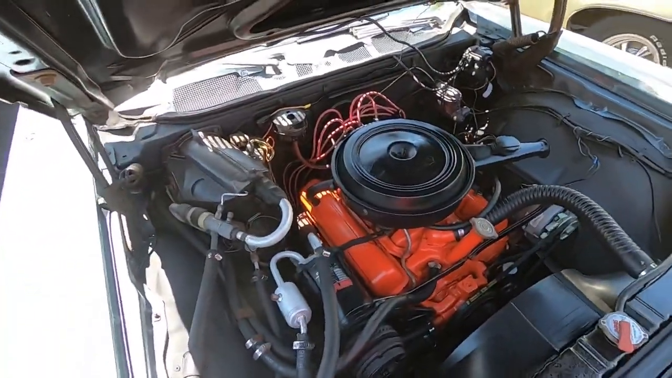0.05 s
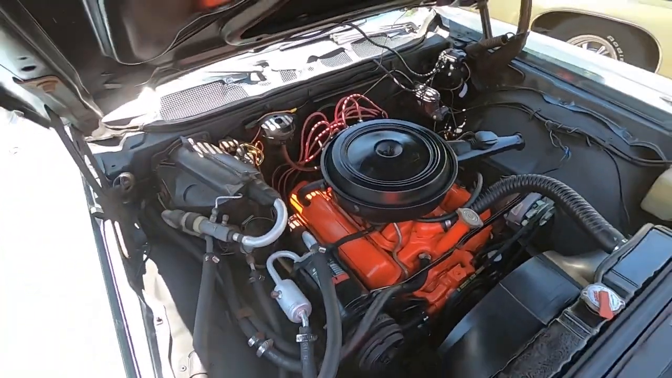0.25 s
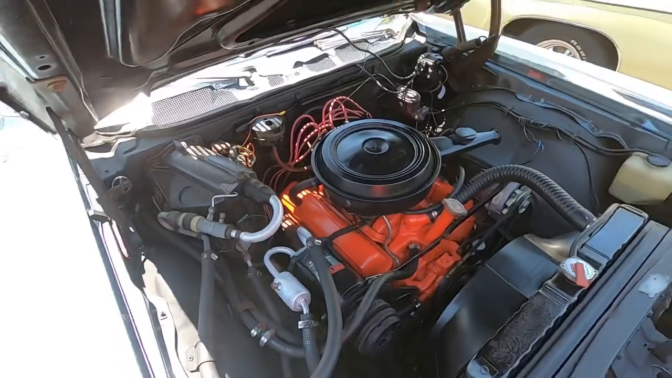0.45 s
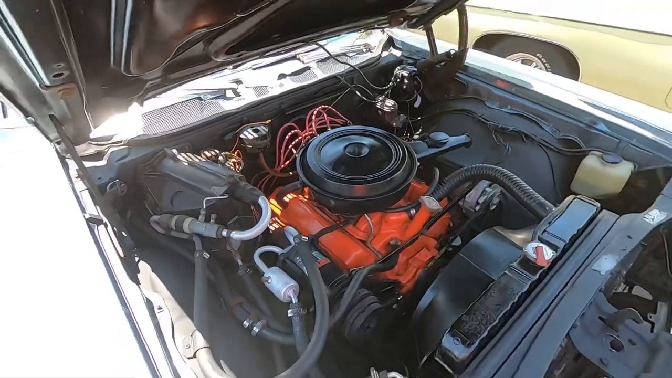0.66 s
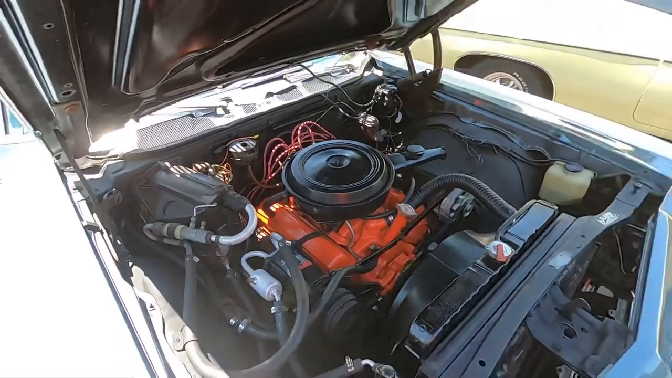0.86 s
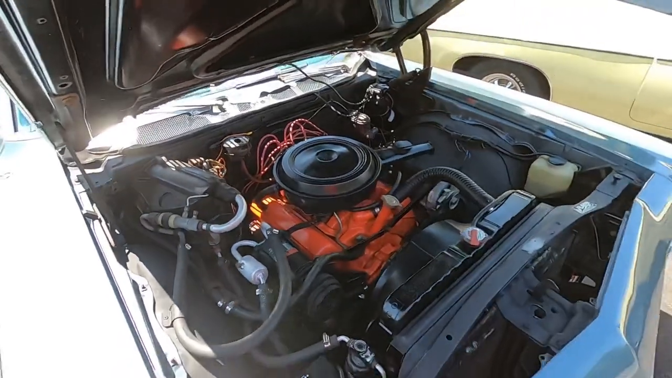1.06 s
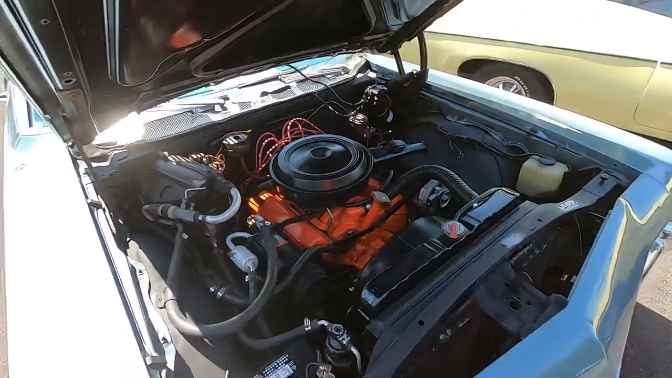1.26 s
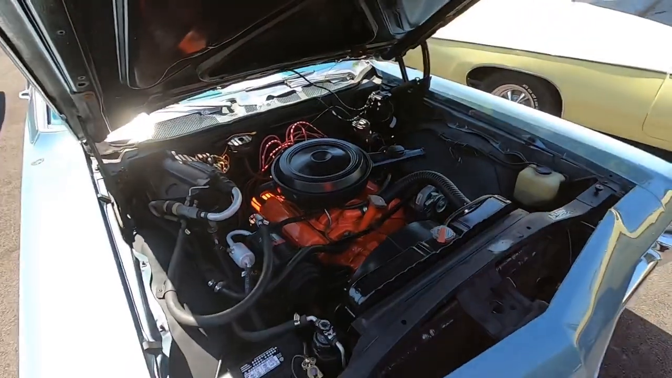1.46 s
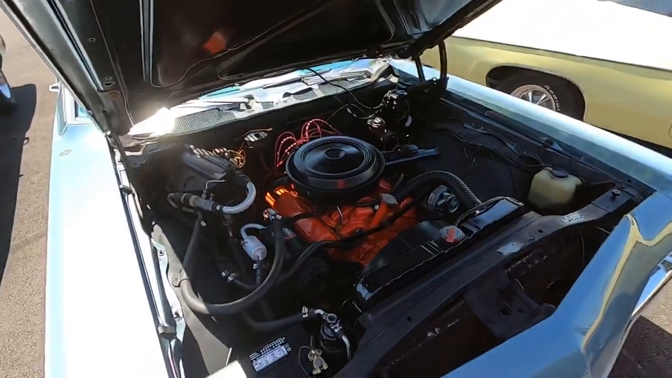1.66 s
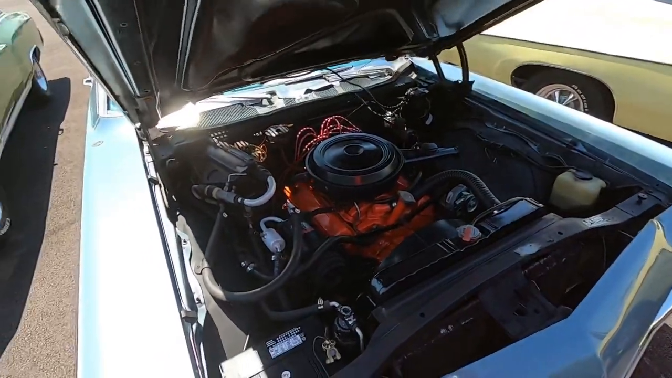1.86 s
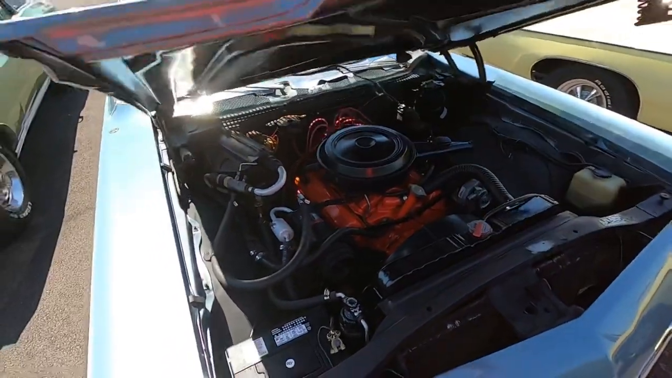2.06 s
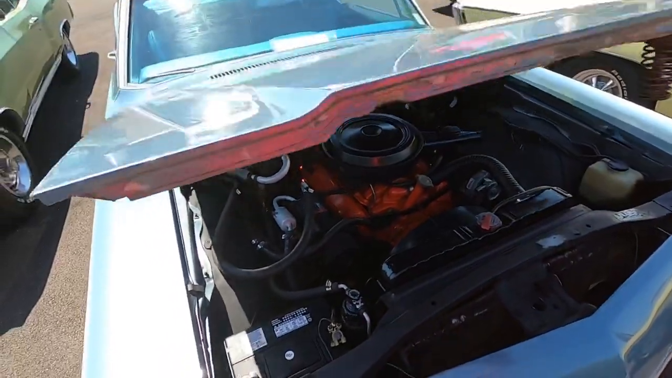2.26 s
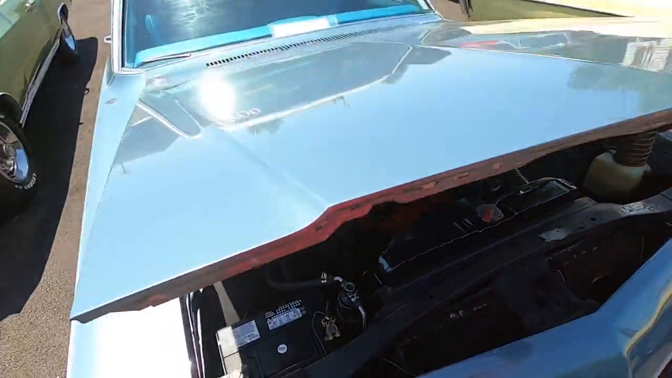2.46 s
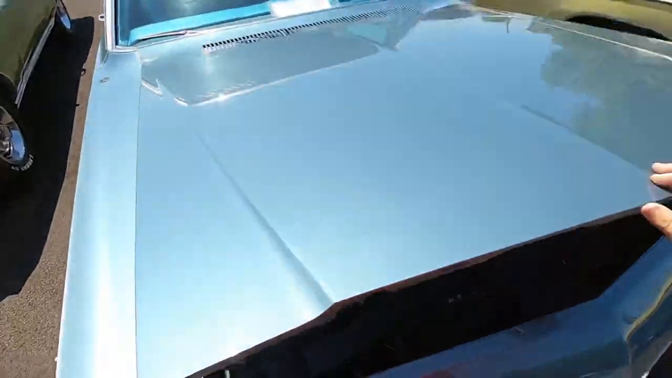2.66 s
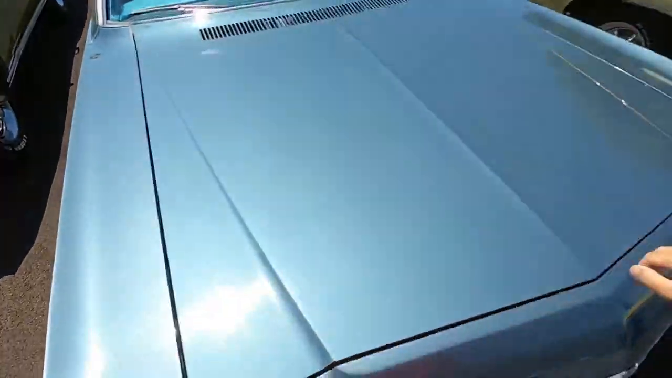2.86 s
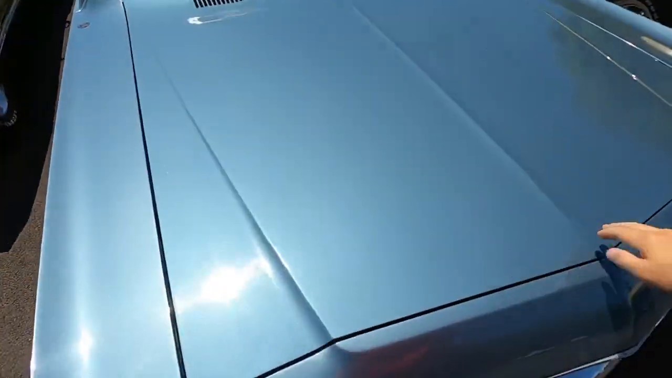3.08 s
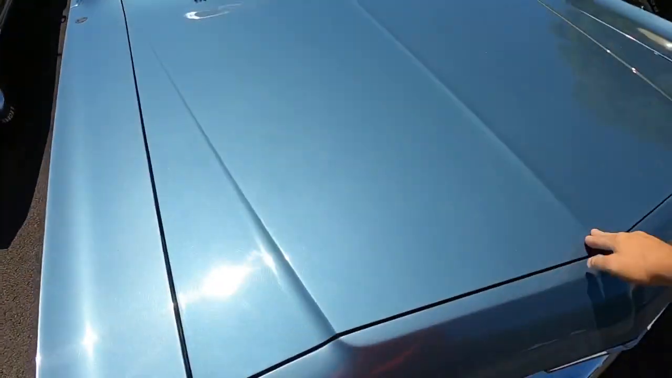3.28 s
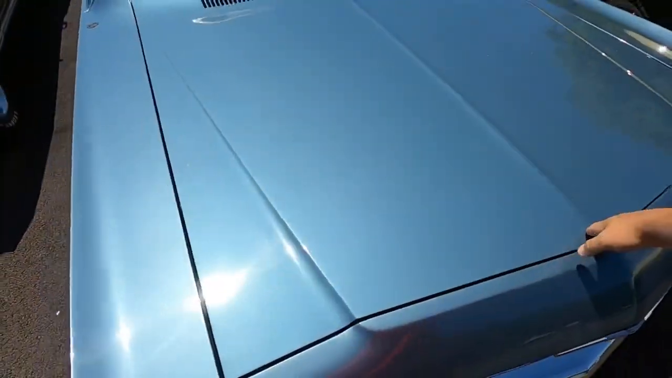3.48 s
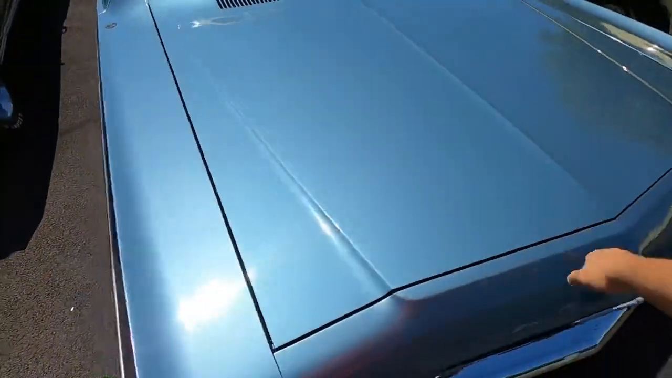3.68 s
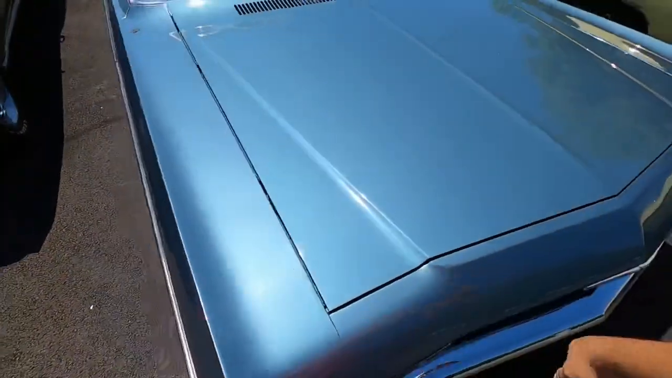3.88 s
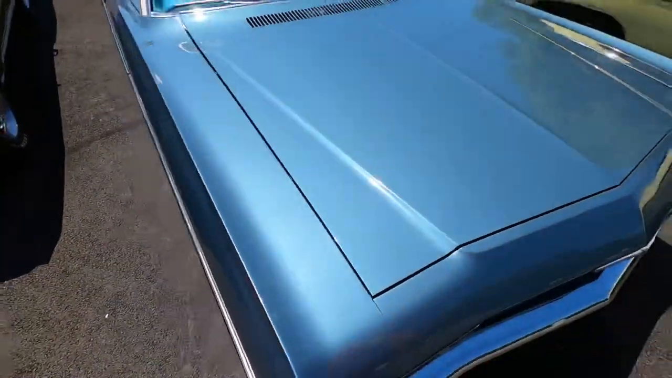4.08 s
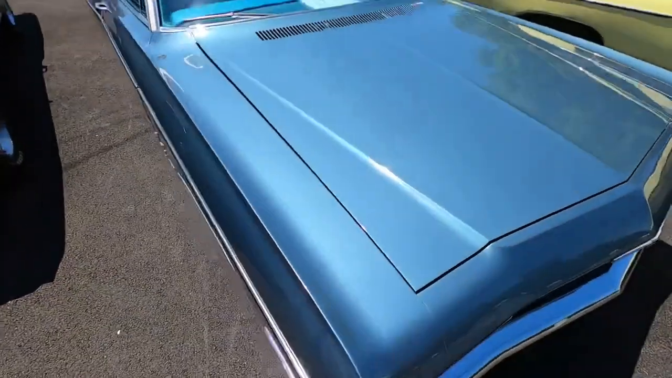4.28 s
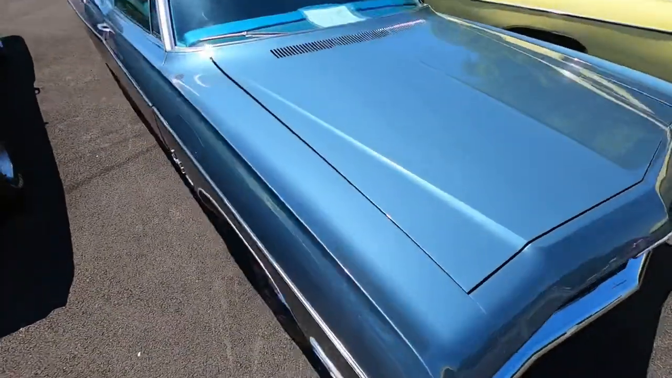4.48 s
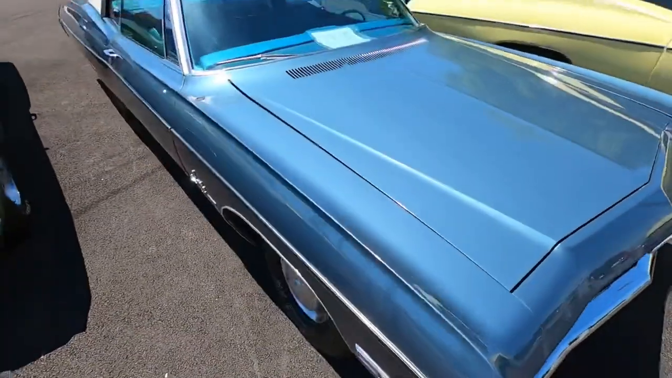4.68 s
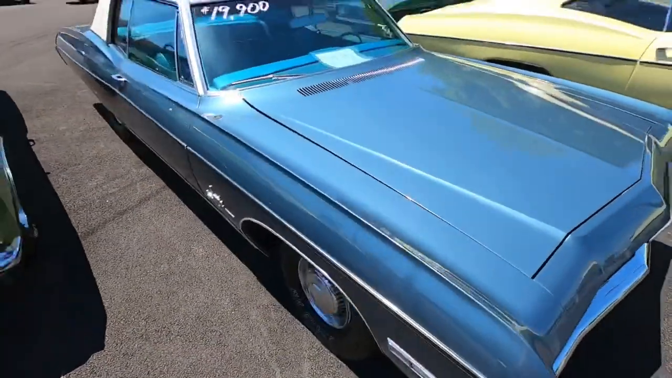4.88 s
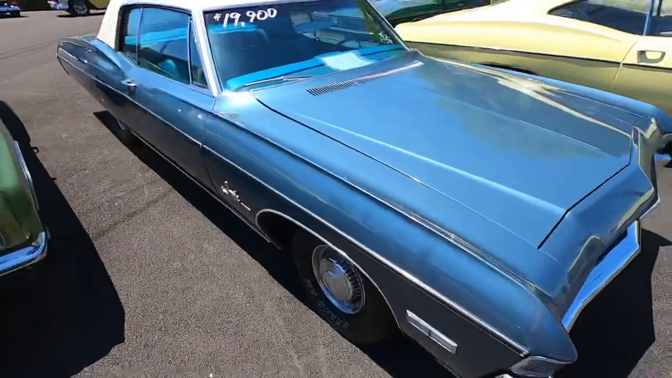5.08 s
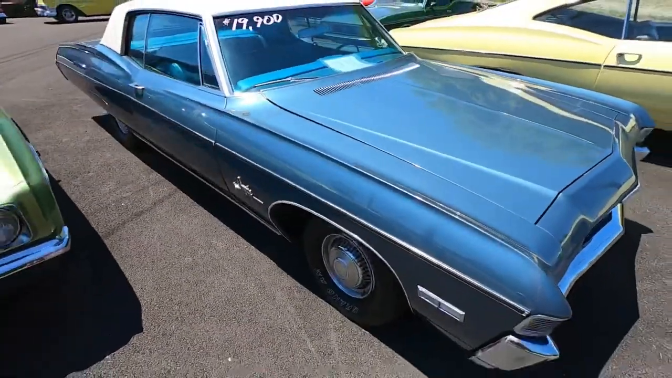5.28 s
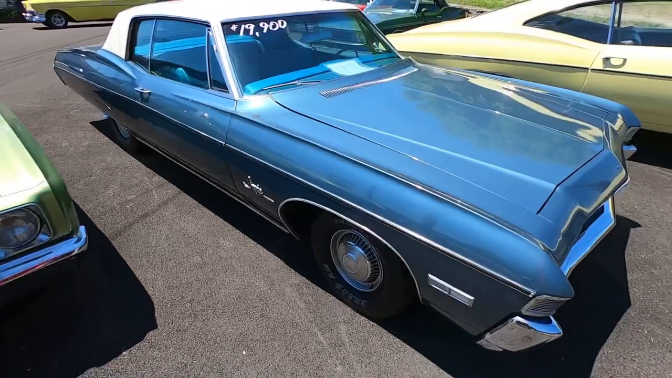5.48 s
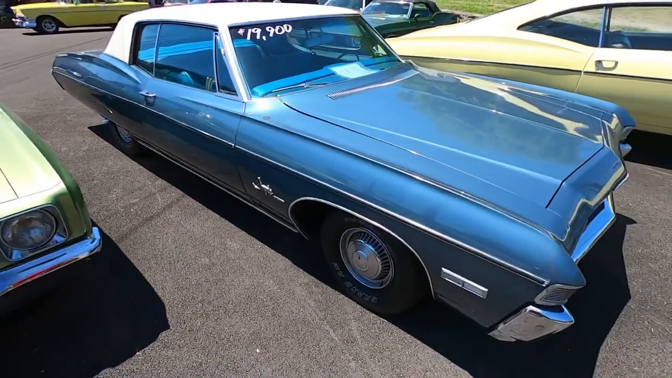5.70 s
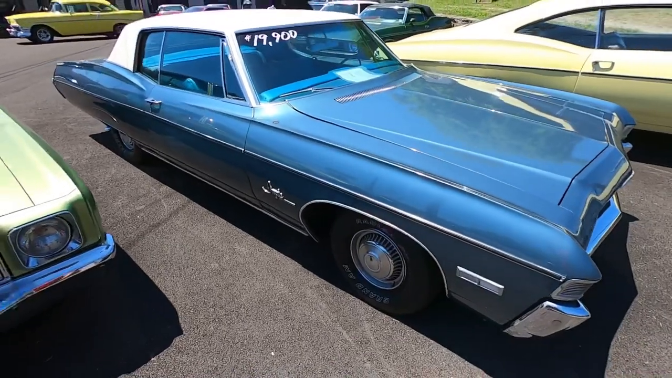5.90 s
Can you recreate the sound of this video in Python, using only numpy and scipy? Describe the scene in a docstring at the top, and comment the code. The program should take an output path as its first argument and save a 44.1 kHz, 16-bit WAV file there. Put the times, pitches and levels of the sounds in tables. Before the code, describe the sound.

Outdoor road rumble slowly thickens while tiny clicks and scuffs come mostly from the right. Midway a large sheet-metal hood bangs shut very loudly, with latch clatter, low boom and a brief shivering rattle, dry and close. Afterwards the traffic seems ducked and recovers gradually, with a brush of cloth, low engine tones rising, one small tick and approaching tyre hiss on the right.

```python
"""In a car park, a heavy steel car hood is dropped shut: latch, bounce and boom.
Struck modes ring under banded noise for the shivering sheet; latch and trim clatter and rattle.
Gliding tones make engines climbing in three stretches, and the narrow hums and thin whistles.
Noise bands make the deep rumble of wind at the microphones, the roar and hiss of traffic, a car
drawing near on the right, rustling cloth and small ticks. Loud sound pulls the gain down for a while."""
import sys
import numpy as np
from scipy import signal
from scipy.fft import irfft, next_fast_len
from scipy.io import wavfile
from scipy.ndimage import uniform_filter1d

SR = 44100
rng = np.random.default_rng(int(sys.argv[2]) if len(sys.argv) > 2 else 0)


def pcm_store(signal):
    """Save signal as 16-bit PCM."""
    levels = np.round(np.clip(np.atleast_2d(signal), -1, 1) * 32767)
    wavfile.write(sys.argv[1], SR, levels.astype(np.int16).T)


N = 261954
TIME = np.arange(N) / SR
COARSE = TIME[::64]  # slower clock for levels that move gently


# hood meeting latch and bumpers, then bouncing: start_s, clatter_db, push_db, clatter_centre_hz
# (clatter_db and push_db are relative)
BLOWS = [(2.9021, -11, -18, 2280), (2.92, -23.5, -4, 6560), (2.923, -18, -39, 3570), (2.946, -27, -6, 8600),
         (2.954, -37, -12, 2180), (2.965, -19, -3, 3020), (3.158, -50, -17.5, 1200),
         (3.172, -45, -42, 7100)]
# ringing modes of the hood: pitch_hz, level_db (relative), t60_s
HOOD_MODES = [(62, 2, 0.16), (108, 11, 0.16), (176, -9, 0.94), (250, -15, 0.88), (294.8, -6, 0.66),
              (367, -11, 0.37), (476, -12.5, 0.65), (506, -8, 0.25), (1030, -27, 0.42), (1172, -6, 0.36),
              (2080, -15, 0.18)]
# colour of the sheet's dense shiver: freq_hz, level_db (relative, per Hz)
SHEET_COLOUR = [(30, -12), (105, -3), (220, -4), (470, -10.5), (900, -19), (2200, -24), (3700, -29.5),
                (4300, -35.5), (6800, -40), (9000, -49), (15500, -77)]
# stereo tilt of the hood: freq_hz, left_minus_right_db
HOOD_BALANCE = [(200, 0.5), (700, -4.5), (2400, -4.5), (5400, -0.5), (8100, -17.5), (15000, -21)]
# stereo likeness of the shiver: freq_hz, likeness (-1 to 1)
HOOD_ALIKE = [(60, 0.93), (290, 1), (640, 0.48), (1400, 0.42), (3100, 0.44), (5500, 0.12), (12000, -0.6)]
SHEET_DB, RING_DB = -9, -10.5
HIGHS_DB, HIGHS_HOLD_S, HIGHS_FALL_DB_S = 4.5, 0.052, 94
FIRST_FALL_DB, FIRST_FALL_S = 7.5, 0.11  # extra early drop of the highs
LOWS_START_DB, LOWS_SWELL_S, LOWS_HOLD_S, LOWS_FALL_DB_S = -15.5, 0.076, 0.1, 123
CLATTER_T60_S = 0.045
LATCH_PAN_DB = -9  # left minus right: the struck parts sit right of the sheet


def hood():
    """Blows ring the modes of the hood, latch and trim clatter, and the sheet shivers and rattles out."""
    size, start = SR * 3 // 5, BLOWS[0][0]
    t = TIME[:size]
    force = np.zeros(size)
    out = latch(t)
    for s, clatter_db, push_db, hz in BLOWS:
        force[int((s - start) * SR)] = undb(push_db)
        clatter = spread(band(hz, 0.6, size=size), 0.22, at_hz(HOOD_BALANCE, hz))
        envelope = fade(t - s + start, 0.00048, CLATTER_T60_S)
        out += 0.31 * undb(clatter_db) * pan(LATCH_PAN_DB) * clatter * envelope
    ring, shiver = hood_ring(force, t), sheet_shiver(t)
    first = SR // 10  # both layers are levelled on their first tenth of a second
    out += undb(RING_DB) * ring / ring[:, :first].std()
    out += undb(SHEET_DB) * shiver / shiver[:, :first].std()
    i = int(start * SR)
    return np.pad(out, ((0, 0), (i, N - i - size)))


def hood_ring(force, t):
    """Each push sets off decaying sines, one for every mode, with alternating signs."""
    ring = 0
    for k, (hz, db, t60) in enumerate(HOOD_MODES):
        mode = (-1) ** k * undb(db - 60 * t / t60) * np.sin(2 * np.pi * hz * t)
        struck = signal.fftconvolve(force, mode)[:len(t)]
        ring = ring + struck * pan(at_hz(HOOD_BALANCE, hz))
    return ring


def sheet_shiver(t):
    """Dense bending of the sheet as noise bands: the highs hold and fall, the lows swell late."""
    lows_db = LOWS_START_DB * np.maximum(1 - t / LOWS_SWELL_S, 0)
    lows_db = lows_db - LOWS_FALL_DB_S * np.maximum(t - LOWS_SWELL_S - LOWS_HOLD_S, 0)
    since_hold = t - HIGHS_HOLD_S
    highs_db = HIGHS_DB - HIGHS_FALL_DB_S * np.maximum(since_hold, 0)
    highs_db = highs_db - FIRST_FALL_DB * np.clip(since_hold / FIRST_FALL_S, 0, 1)
    highs_db = highs_db + walk(60)[:len(t)]  # loose parts rattle
    shiver = 0
    for hz in 35 * 2 ** np.arange(0, 8.8, 1 / 3):
        noise = spread(band(hz, .25, size=len(t)), at_hz(HOOD_ALIKE, hz), at_hz(HOOD_BALANCE, hz))
        # share of the highs' envelope: the treble dies soonest
        high = at_hz([(250, 0.24), (1500, 0.53), (4500, 0.87), (12000, 0.97)], hz)
        colour_db = at_hz(SHEET_COLOUR, hz) + 10 * np.log10(hz)  # per Hz to per band
        shiver = shiver + undb(colour_db + max(1 - high, 0) * lows_db + high * highs_db) * noise
    return shiver


# modes of latch and trim: pitch_hz, level_db (relative)
LATCH_MODES = [(1170, -5), (2085, -0.5), (2296, -9), (2740, -4), (3340, -2.5), (3750, -3.5), (6700, -2.5),
               (8900, -2.5)]
RATTLES, RATTLE_S = 70, .26  # how many random knocks, over how long
RATTLE_DB, RATTLE_FALL_DB_S = -28.5, 79.5  # softest first knock, and how fast knocks weaken
LATCH_T60_S = 0.029


def latch(t):
    """Blows and random knocks of loose parts ring nearby latch modes, with random sign and slight detuning."""
    luck = rng.random((RATTLES, 3))
    late = RATTLE_S * luck[:, 0]
    knock_db = RATTLE_DB - RATTLE_FALL_DB_S * late + 9 * luck[:, 1]
    rattles = np.c_[late, knock_db, 900 * 4.5 ** luck[:, 2]]
    blows = [(s - BLOWS[0][0], db, hz) for s, db, _, hz in BLOWS]
    out, size = np.zeros((2, len(t))), SR // 16
    hz, db = np.transpose(LATCH_MODES)
    mode_pan = pan(at_hz(HOOD_BALANCE, hz))
    envelope = fade(t[:size], 0.00041, LATCH_T60_S)
    for s, hit_db, centre_hz in np.r_[blows, rattles]:
        strength = np.exp(-(np.log2(hz / centre_hz) / 0.36) ** 2) * undb(db + hit_db)
        chance = rng.standard_normal((2, len(hz)))
        detuned_hz = hz * (1 + 0.011 * chance[0])
        modes = np.sin(2 * np.pi * np.outer(detuned_hz, t[:size])) * envelope
        i = int(s * SR)
        out[:, i:i + size] += (mode_pan * strength * np.sign(chance[1])) @ modes
    return out * pan(LATCH_PAN_DB)


# climbing stretches of engine tone, one list each; the first two may be one engine changing gear:
# time_s, firing_rate_hz, level_db (before overtones)
ENGINE_CLIMBS = [
    [(0, 104.9, -40.5), (.45, 101.2, -34.5), (0.698, 112.4, -64), (1.198, 131, -33.5), (1.84, 155.9, -40.5),
     (2.402, 171.8, -36), (2.88, 182.1, -36.5)],
    [(3.3, 130.6, -35), (4.096, 138.1, -40), (4.801, 151, -27.5), (5.201, 156.1, -37), (5.94, 163, -33)],
    [(4.5, 52.5, -37), (4.649, 62.34, -25.5), (4.849, 74.8, -32), (5.301, 88.7, -29), (5.94, 114.3, -34.5)],
]
# partials, one list per stretch: multiple of the firing rate, level_db (relative)
OVERTONES = [
    [(1, -1)],
    [(1, -4.5)],
    [(.5, -17.5), (1, -2), (2, -12.5)],
]


def engines():
    """Firing pulses as gliding tones, in three stretches that climb as engines gain speed."""
    return sum(tone(glide, partials, 2.13, 6.6, 0.0031) for glide, partials in zip(ENGINE_CLIMBS, OVERTONES))


def tone(glide, partials, waver_db, waver_rate, wobble):
    """A gliding tone with overtones, unsteady in level and pitch."""
    s, hz, db = np.transpose(glide)
    unsteady_hz = np.interp(TIME, s, hz) * (1 + wobble * walk(12))
    turn = 2 * np.pi * np.cumsum(unsteady_hz) / SR
    wave = sum(undb(d + waver_db * walk(waver_rate)) * np.sin(k * turn) for k, d in partials)
    return np.sqrt(2) * wave * undb(np.interp(TIME, s, db)) * edges(s, .05)


# ticks, scuffs and one short low hum near 290 Hz: start_s, level_db (about the peak), centre_hz,
# width_octaves, t60_ms, left_minus_right_db
TICKS = [(0.552, -47, 1686, 1.06, 153, -2), (.606, -55, 5200, .8, 36, -5.5),
         (1.062, -61, 6000, 0.55, 25, -9), (1.553, -43, 1745, 0.89, 152, -5),
         (1.62, -36.5, 290, 0.13, 240, 0), (1.937, -40, 1404, 0.95, 78, -5),
         (2.003, -57, 8500, 0.53, 9, -19.5), (2.021, -60, 11000, .4, 9, -18),
         (2.049, -46, 4060, 1.3, 49, -9), (2.148, -36.5, 5770, 0.2725, 10.6, -12),
         (2.159, -54, 11000, .4, 11, -23), (2.185, -40.5, 8000, 0.57, 19, -25),
         (2.196, -49, 5500, 0.73, 12, -18), (2.599, -48, 900, 0.89, 20, 8),
         (5.345, -34, 2060, 0.61, 12, -22)]
CLICK_MS = 19.7  # at this t60 click and noise are equally strong; shorter ticks click harder


def ticks():
    """Ragged bursts of banded noise with a click in front; long ones start slowly, the narrow low one hums."""
    out, size = np.zeros((2, N)), SR // 4
    t = TIME[:size]
    ragged = undb(2.5 * walk(260))
    for s, db, hz, octaves, t60_ms, pan_db in TICKS:
        i = int(s * SR)
        t60 = t60_ms / 1000
        shape = fade(t, 2.28 * t60 ** 2, t60)
        burst = spread(band(hz, octaves, size=size), 0.62, pan_db) * shape * ragged[i:i + size]
        burst = unit(burst) * np.sqrt(np.mean(shape ** 2))
        late = t * hz * octaves - 1
        pulse = np.exp(-late ** 2 * np.pi) * np.sin(2 * np.pi * late / octaves)
        click = CLICK_MS / t60_ms * pulse * pan(pan_db)
        out[:, i:i + size] += undb(db) * (burst + click)
    return out


# strokes of cloth: middle_s, length_s, level_db (before grain and panning)
RUSTLE = [(1.448, 0.2, -64.5), (1.59, 0.081, -64.5), (1.69, 0.15, -63), (1.874, 0.27, -68.5),
          (2.128, 0.2, -61), (3.12, 0.2, -53), (3.652, 0.46, -65.5)]
# colour of the cloth: freq_hz, level_db (relative, per Hz)
RUSTLE_COLOUR = [(2000, -61), (3500, -19), (6600, -4), (7800, -11), (9000, -1.5), (11000, -15),
                 (15000, -25)]


def rustle():
    """Cloth rubbing as fine grainy noise, each stroke swelling once, mostly at the right microphone."""
    noise = shaped(lambda f: undb(at_hz(RUSTLE_COLOUR, f)))
    gain = 0
    for middle, length, db in RUSTLE:
        gain = gain + undb(db) * np.sqrt(swell(middle - length / 2, middle + length / 2))
    grain = undb(1.46 * walk(120))
    return noise * gain * grain * undb([[-12], [5]])  # left, right dB


# thin unsteady whistles: start_s, end_s, pitch_hz, level_db (before wavering), left_minus_right_db
WHISTLE = [(.93, 1.36, 7725, -71.5, -6), (4.05, 4.65, 7608, -68.5, -7), (5.02, 5.72, 7583, -68.5, -12)]
# narrow sagging hums: start_s, end_s, start_hz, end_hz, width_hz, level_db (before wavering),
# left_minus_right_db
HUMS = [(0.0, 1.0, 808, 805, 21, -59.5, -8), (1.713, 2.954, 568, 516.8, 16, -50, -13.5),
        (1.747, 2.654, 410.6, 377.8, 21.3, -48, -3)]
WHISTLE_WIDTH_HZ = 10


def whistle():
    """Whistles and hums: sines wandering in pitch and level, each swelling once."""
    out = 0
    steady = [(s0, s1, hz, hz, WHISTLE_WIDTH_HZ, db, pan_db) for s0, s1, hz, db, pan_db in WHISTLE]
    for s0, s1, hz0, hz1, width, db, pan_db in HUMS + steady:
        wandering_hz = np.interp(TIME, [s0, s1], [hz0, hz1]) + width / 2 * walk(60)
        turn = 2 * np.pi * np.cumsum(wandering_hz) / SR
        level = undb(db + 3.0 * walk(24) + 1.8 * walk(75)) * swell(s0, s1) ** 1.2
        out = out + level * pan(pan_db) * np.sqrt(2) * np.sin(turn)
    return out


# colour of the wind's deep rumble and, above it, the traffic: freq_hz, level_db (relative, per Hz)
WIND_AND_ROAD_COLOUR = [(20, -12), (80, -2.5), (160, -10.5), (260, -15.5), (340, -21), (580, -19),
                        (1410, -32), (3500, -42.5), (6300, -57), (9500, -62), (12000, -91.5)]
# stereo tilt of wind and traffic: freq_hz, left_minus_right_db
WIND_AND_ROAD_BALANCE = [(40, -1.5), (300, -1), (1290, 6), (4400, 0), (8100, -13)]
# stereo likeness of wind and traffic: freq_hz, likeness (-1 to 1)
WIND_AND_ROAD_ALIKE = [(30, 0.96), (65, 0.68), (130, 0.86), (290, 1), (640, 0.62), (1400, -0.029),
                       (3100, 0.56), (6800, -0.52)]
# wandering of the wind's deep rumble: time_s, level_db (before its share)
WIND = [(0, 5.5), (.7, -2), (2.0, 8), (2.45, 13.5), (2.88, 14.5), (4.3, -19.5), (4.7, -9), (5.94, 2)]
# how much of that wandering a band takes: freq_hz, share (of the dB)
WIND_SHARE = [(40, 0.65), (130, 0.074)]
# offset before the traffic thickens: freq_hz, level_db
SWELL = [(130, 1.5), (500, -5.5), (1300, -6), (4000, -7)]
# colour of the car's tyres at the reference distance: freq_hz, level_db (relative, per Hz)
CAR_COLOUR = [(290, -35.5), (750, -16.5), (1300, -18), (2000, -27), (3500, -41.5), (6500, -45),
              (10000, -70)]
# stereo tilt of the car: freq_hz, left_minus_right_db
CAR_BALANCE = [(700, -15.5), (1290, -19), (2380, -20), (4400, -1), (8120, -15.5)]
SWELL_FROM_S, SWELL_TO_S = 0.86, 2.61  # the traffic thickens over this time
CAR_SPEED_M_S, CAR_CLOSEST_S = 29, 6.39  # it would be closest just after the sound ends
CAR_KERB_M, CAR_REF_M = 16, 15
CAR_ALIKE = -0.61  # likeness of left and right, -1 to 1


def wind_and_road():
    """Flickering third-octave noise: wind rumble wanders, traffic thickens, a car grows by inverse distance."""
    wind_db = np.interp(COARSE, *np.transpose(WIND))
    thin = np.interp(COARSE, [SWELL_FROM_S, SWELL_TO_S], [1, 0])
    near = CAR_REF_M / np.hypot(CAR_SPEED_M_S * (COARSE - CAR_CLOSEST_S), CAR_KERB_M)
    out = np.zeros((2, N))
    for hz in 25 * 2 ** np.arange(0, 8.8, 1 / 3):
        flicker_db = np.interp(np.log(hz), np.log([60, 600]), [2.5, .8]) * walk(7.6, times=COARSE)
        flicker = np.sqrt(hz) * undb(flicker_db)  # the root turns level per Hz into level per band
        level_db = at_hz(WIND_AND_ROAD_COLOUR, hz) + at_hz(WIND_SHARE, hz) * wind_db
        level_db = level_db + at_hz(SWELL, hz) * thin
        level = np.interp(TIME, COARSE, undb(level_db) * flicker)
        alike, balance_db = at_hz(WIND_AND_ROAD_ALIKE, hz), at_hz(WIND_AND_ROAD_BALANCE, hz)
        out += level * spread(band(hz, .25), alike, balance_db)
        if hz > CAR_COLOUR[0][0]:
            car = np.interp(TIME, COARSE, undb(at_hz(CAR_COLOUR, hz)) * near * flicker)
            out += car * spread(band(hz, .25), CAR_ALIKE, at_hz(CAR_BALANCE, hz))
    return out * undb(-56)


def undb(db):
    """Decibels to gain."""
    return 10 ** (np.asarray(db) / 20)


def unit(x):
    """Scale to rms 1."""
    return x / np.sqrt(np.mean(x ** 2))


def at_hz(table, hz):
    """Read a (Hz, value) table on a log-frequency axis."""
    f, v = np.transpose(table)
    return np.interp(np.log(hz), np.log(f), v)


def pan(left_minus_right_db):
    """Left and right gains, each taking half the difference."""
    return undb(left_minus_right_db * np.array([[.5], [-.5]]))


def shaped(gain, size=N):
    """Two unrelated noises with the spectrum gain(Hz) and random phases, rms 1."""
    n = next_fast_len(size)
    weight = gain(np.maximum(np.arange(n // 2 + 1) * SR / n, 1))
    used = weight > weight.max() / 3000  # skip the weakest lines
    lines = np.zeros((2, len(weight)), complex)
    lines[:, used] = weight[used] * np.exp(2j * np.pi * rng.random((2, used.sum())))
    return unit(irfft(lines, n)[:, :size])


def band(hz, octaves, size=N):
    """Noise in a bell-shaped band."""
    return shaped(lambda f: np.exp(-(np.log2(f / hz) / octaves) ** 2), size=size)


def spread(pair, alike, balance_db):
    """Mid and side weighted for the likeness of left and right, then tilted."""
    c = np.clip(alike, -.98, .98)
    mid = np.sqrt((1 + c) / 2) * pair[0]
    side = np.sqrt((1 - c) / 2) * pair[1]
    return np.array([mid + side, mid - side]) * pan(balance_db)


def walk(rate, times=TIME):
    """Random levels joined smoothly, rate a second; rms 1."""
    knots = rng.standard_normal(int(rate * N / SR) + 3)
    k, part = np.divmod(times * rate, 1)
    k = k.astype(int)
    ease = np.sin(np.pi / 2 * part) ** 2
    return unit(knots[k] * (1 - ease) + knots[k + 1] * ease)


def fade(t, rise, t60):
    """Swell for rise seconds, then die away by 60 dB in t60 seconds."""
    t = np.maximum(t, 0)
    attack = np.sin(np.pi / 2 * np.minimum(t / rise, 1))
    return attack * undb(-60 * np.maximum(t - rise, 0) / t60)


def edges(s, soft):
    """Gain that is open from the first time to the last, with ramps of soft seconds outside."""
    return np.clip(np.minimum(TIME - s[0] + soft, s[-1] + soft - TIME) / soft, 0, 1)


def swell(s0, s1):
    """One smooth rise and fall between two times."""
    return np.sin(np.pi * np.clip((TIME - s0) / (s1 - s0), 0, 1))


DUCK_OVER_DB, DUCK_SHARE = -24, 0.72  # threshold, and dB of cut per dB above it
DUCK_ATTACK_S, DUCK_RELEASE_DB_S = 0.14, 5.5


def gain_control(x):
    """Loud sound pulls the gain down quickly; it creeps back at a steady rate."""
    power = uniform_filter1d(np.mean(x ** 2, axis=0), SR // 50)[::64]
    level_db = 10 * np.log10(np.abs(power) + 1e-12)
    wanted = DUCK_SHARE * np.maximum(level_db - DUCK_OVER_DB, 0)
    step, cut_db, now = COARSE[1], [], 0
    for want in wanted:
        if want > now:
            now = now + (want - now) * step / DUCK_ATTACK_S
        else:
            now = max(now - DUCK_RELEASE_DB_S * step, want)
        cut_db.append(now)
    return x * undb(-np.interp(TIME, COARSE, cut_db))


def scene():
    """Everything at the two microphones."""
    return hood() + engines() + ticks() + rustle() + whistle() + wind_and_road()


TOP_HZ = 15350


def record(dry):
    """The gain ducks under the bang, the loudest peaks are rounded and the top is cut."""
    rounded = np.tanh(0.76 * gain_control(dry)) / 0.84
    low_pass = signal.ellip(8, .2, 70, TOP_HZ, fs=SR, output="sos")
    return signal.sosfilt(low_pass, rounded)


dry = scene()
out = record(dry)
pcm_store(out)
```